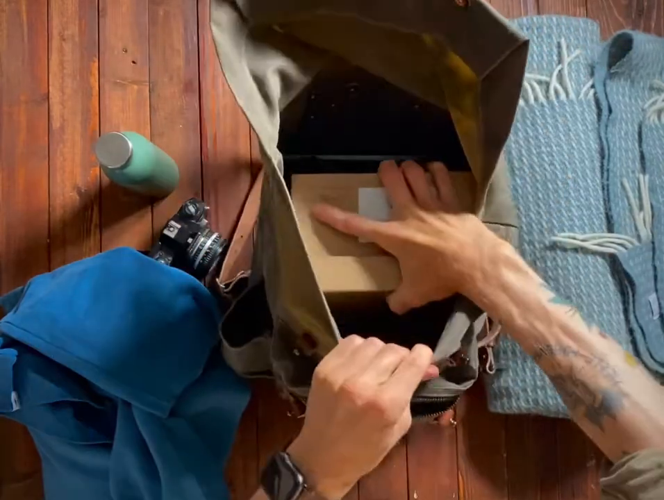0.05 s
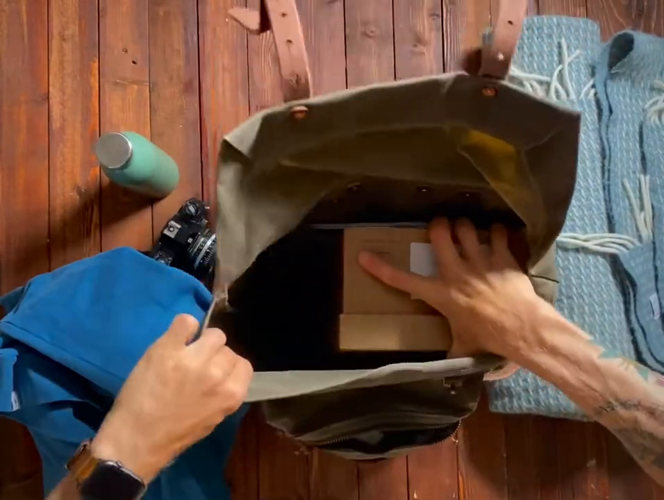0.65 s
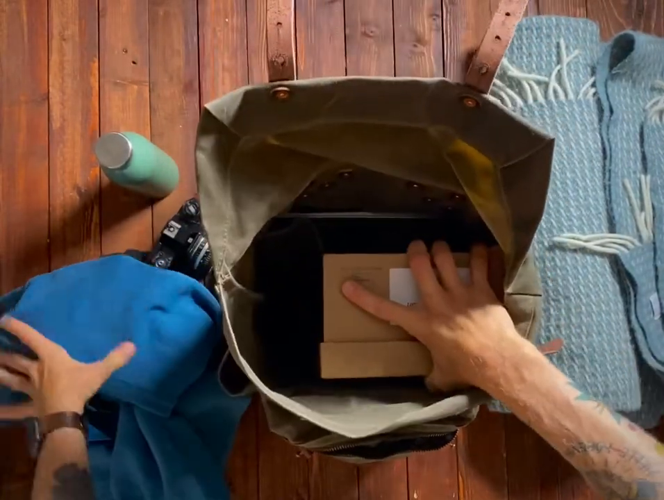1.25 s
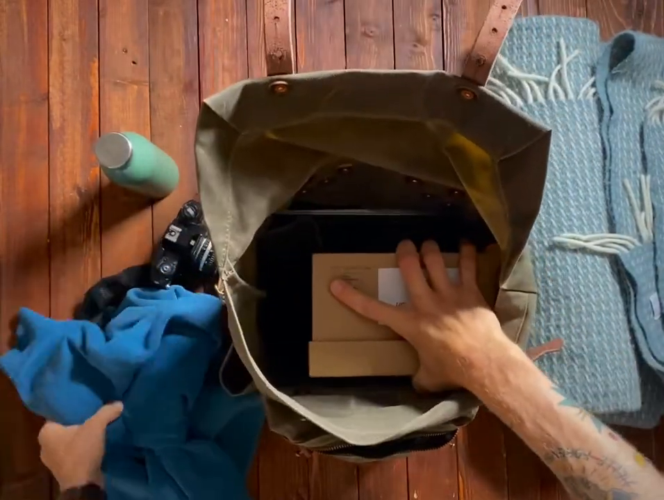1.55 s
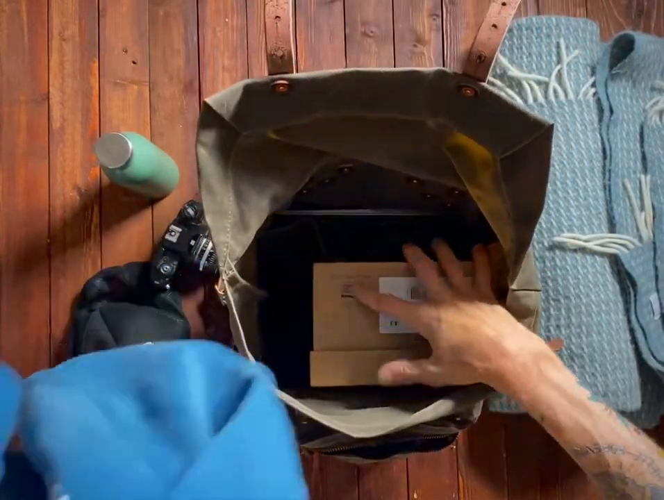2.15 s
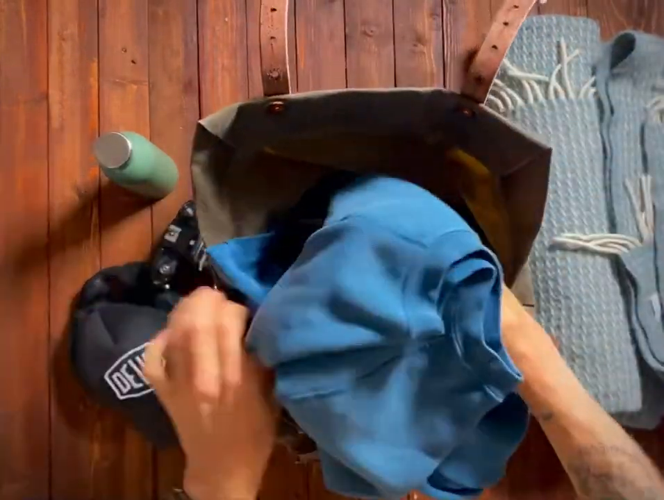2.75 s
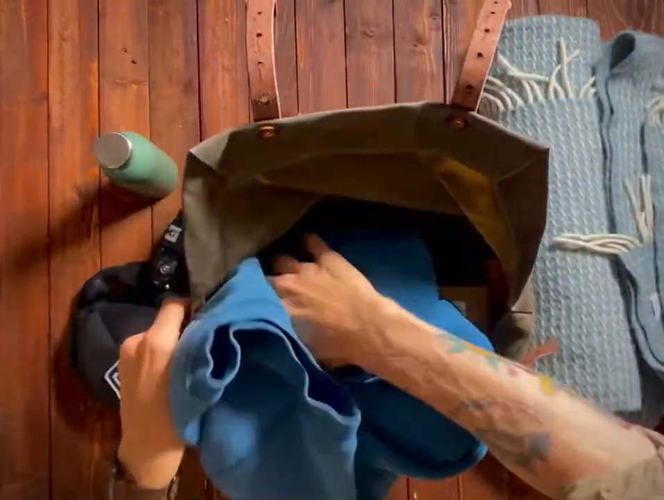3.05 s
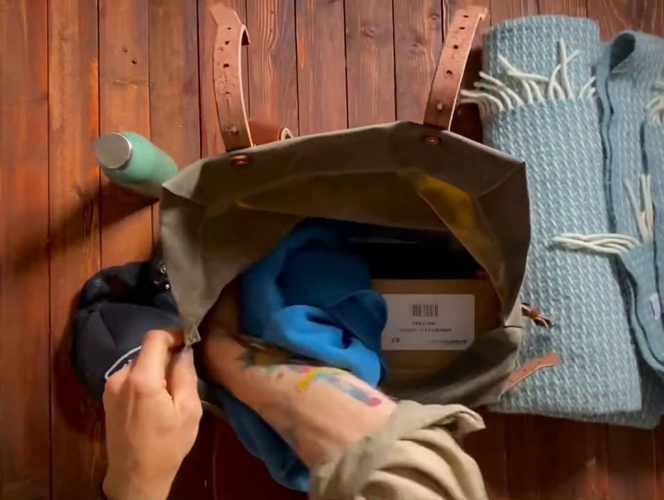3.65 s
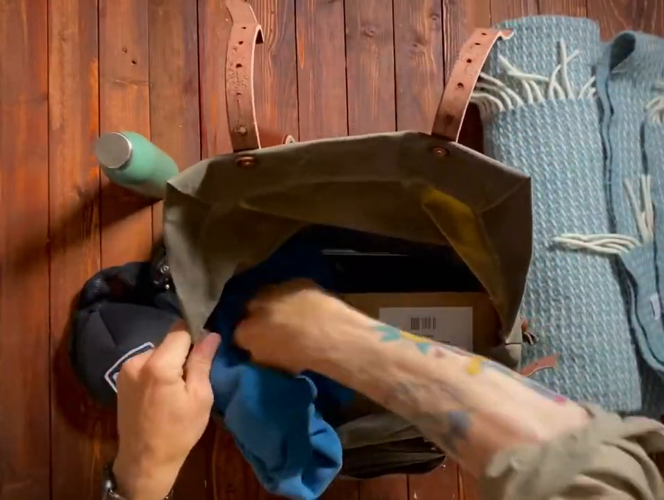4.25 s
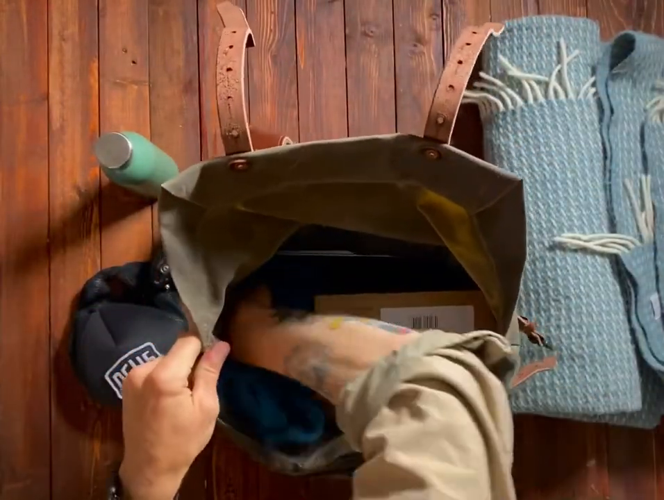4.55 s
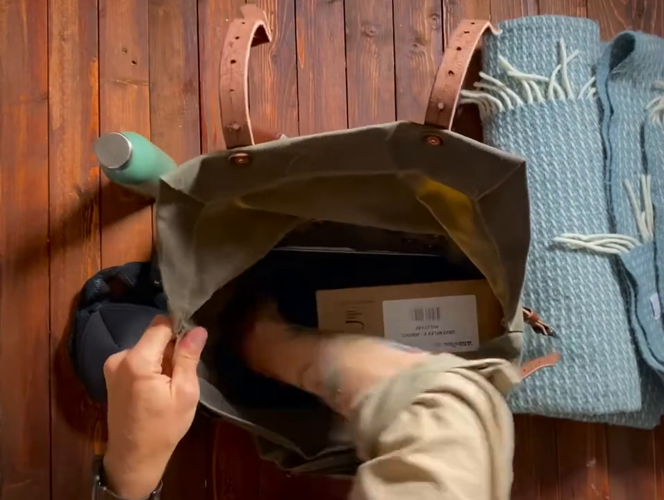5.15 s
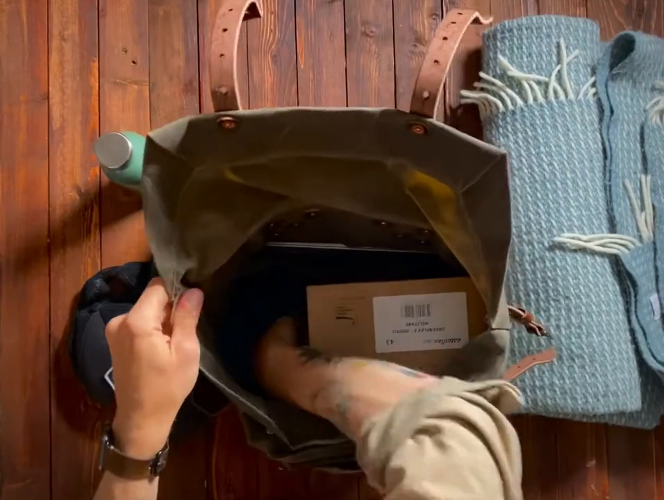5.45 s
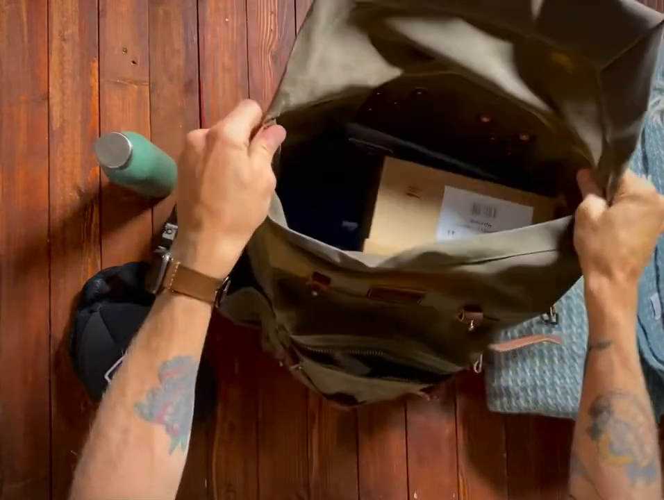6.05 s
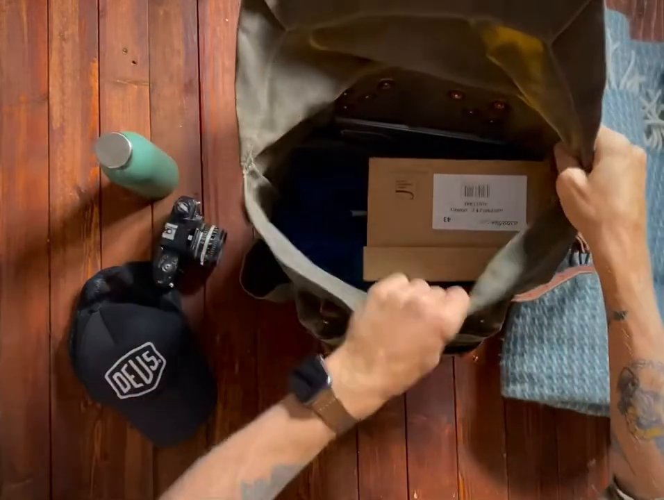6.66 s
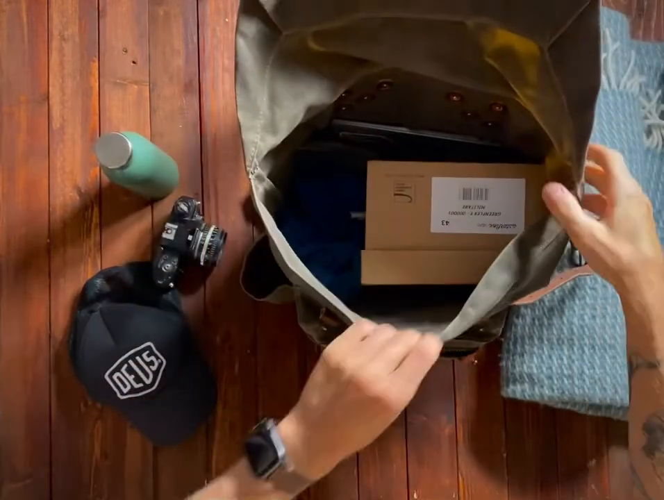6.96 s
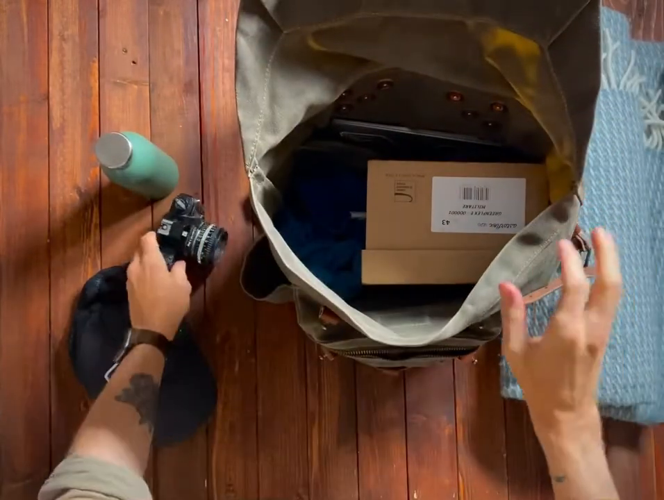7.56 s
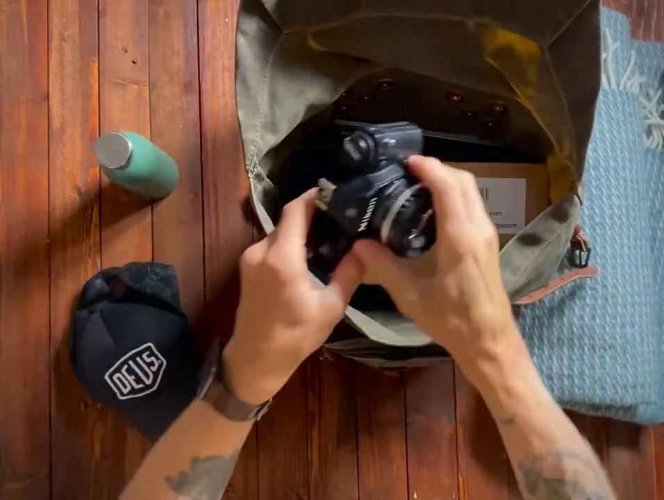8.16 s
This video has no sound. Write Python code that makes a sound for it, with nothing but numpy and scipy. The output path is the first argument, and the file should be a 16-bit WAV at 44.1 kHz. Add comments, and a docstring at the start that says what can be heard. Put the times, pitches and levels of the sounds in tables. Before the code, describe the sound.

For the first second, a stiff canvas backpack is pulled open close by, rasping, snapping taut and flopping on a wooden floor with soft, low thumps. Quieter cloth rustling follows as a sweatshirt is gathered. At about 2.5 seconds a cardboard box drops over with one hollow knock, the loudest sound. From 3 to 5.5 seconds the sweatshirt is stuffed inside in uneven, hissing and scraping pushes, with buckling folds, a few small ticks and a dull bump near 5.2. Around 6 seconds the bag is shaken: canvas snaps, buckles clack sharply and metal fittings tinkle briefly. The rustle and soft bumps die down by 7 seconds. A faint tinkle comes near 7.7, then a camera is picked up with a few dry ticks around 8 seconds. The room is small and boxy, with still air and a very faint appliance whine underneath.

```python
"""A sweatshirt is stuffed into a canvas backpack: threads catch and slip in a hiss and rasp, folds
buckle, and the stiff bag snaps taut and flops on the wooden floor of a small, boxy room.
A cardboard box beside it drops over with one hollow knock. The bag is shaken so that its buckles
clack and its fittings tinkle; then a camera is picked up with a few dry ticks.
Under it all lies a bed of still air with a faint appliance whine."""
import sys
import numpy as np
from scipy import signal
from scipy.fft import rfft, irfft
from scipy.io import wavfile
from scipy.ndimage import uniform_filter1d

SR = 44100
rng = np.random.default_rng(int(sys.argv[2]) if len(sys.argv) > 2 else 0)


def persist_wave(psi):
    """Save psi, clipped to +-1, as 16-bit WAV."""
    counts = np.round(np.clip(psi, -1, 1) * 32767).astype(np.int16)
    wavfile.write(sys.argv[1], SR, np.atleast_2d(counts).T)


N = 366912
TIME, FREQ = np.arange(N) / SR, np.fft.rfftfreq(N, 1 / SR)
HIT_TIME = TIME[:SR // 2]  # half-second clock for one-shots

# Table levels are relative: each layer has its own fader in the mix.
AIR_EQ = [(25, -7), (60, 2), (120, 1), (180, -7.5), (260, -2), (500, -14), (1000, -16.5), (1500, -17.5),
          (2200, -21.5), (2700, -14.5), (3400, -32.5), (8000, -25.5), (15000, -31.5)]  # room tone: f/Hz, level/dB
WHINE = [(1437, -87), (1561, -95)]  # appliance partials: f/Hz, level/dB
ROOM_DECAY = [(100, 0.13), (400, 0.25), (1500, 0.24), (5000, 0.06), (14000, 0.1)]  # reverb time: f/Hz, t60/s
WALL_ECHOES = [(.00752, -13.5), (.00907, -16.5), (0.0183, -14.5)]  # early reflections: delay/s, level/dB
WALL_EQ = [(200, -10), (2000, -1.5), (5000, -6.5), (14000, -12.5)]  # their colour: f/Hz, level/dB
COHERENCE = [(100, 0.98), (300, 0.94), (680, 0.74), (950, 0.13), (1300, 0.69), (1800, 0.77), (2300, 0.35),
             (3600, 0.17), (6500, 0.72), (8000, 0.72), (9000, 1.0), (10500, 0.59), (12300, 1.0),
             (14000, 0.54)]  # how alike left and right are: f/Hz, coherence/0-1
LEFT_LEAD = [(250, 0.03), (750, -0.85), (1100, 0.18), (1800, -0.18), (3000, -1.86), (4000, -0.25),
             (5200, -0.89), (6500, 0.04), (8600, 3.12), (9500, 3.15), (11700, 6.23), (12900, 6.29),
             (14700, 9.4)]  # left ahead of right: f/Hz, phase/rad
BALANCE = [(60, 0.9), (250, 1.85), (500, 2.5), (900, -2.5), (1350, 3), (2300, 0), (3600, -1.5),
           (5000, -4.5), (6500, -.5), (14000, 0)]  # left over right: f/Hz, level/dB

TICKS = [(1.312, -47, -5), (3.6248, -52, -11), (3.76, -52, -9), (4.98, -72, -43), (5.2282, -37, -13),
         (5.7307, -31.5, -14), (6.563, -48, -12), (7.459, -50, -12), (7.9794, -37, -20.5), (8.121, -52, -6),
         (8.1617, -52, -4), (8.181, -39.5, -7), (8.196, -57, -1)]  # fingernails, rivets and camera body: t/s, level/dB, brightness/dB
TICK_EQ = [(300, -14), (1000, -8.5), (1500, -4.5), (2200, -6.5), (2900, -3.5), (4000, -7), (6500, -3.5),
           (13000, -10), (15000, -2.5)]  # dry tick: f/Hz, level/dB
SMALL_PART_MODES = [(2654, 200, 6), (4900, 160, 3)]  # rivets and camera parts: f/Hz, width/Hz, boost/dB
TINKLES = [(5.9808, -41, 0.28), (6.01, -36.5, .6), (6.1444, -42, 0.17), (6.2841, -49.5, .2),
           (6.5021, -60, 0.35), (7.7064, -61.5, 0.025), (7.722, -57.5, .02)]  # fittings touch, damped by cloth or fingers: t/s, level/dB, t60/s
METAL_MODES = [(5090, -12, 0.11), (5300, -14, .1), (6540, -8, .15), (7850, 5, .15), (12290, 2, 0.17),
               (12470, 2, .17), (11800, -7, 0.073), (13100, -6, .08)]  # ring of a fitting: f/Hz, level/dB, t60/s
CLACKS = [(5.875, -32.5, 0.011, -9.5), (5.917, -35, 0.02, -17), (5.9812, -20.5, 0.022, -24.5),
          (6.0099, -20, 0.013, -24)]  # swinging buckles collide: t/s, level/dB, t60/s, brightness/dB
CLACK_EQ = [(300, 0.5), (800, -14), (1150, -2), (1900, -7.5), (2500, -5.5), (4100, -9), (7000, -3.5),
            (12000, -13), (15000, -27)]  # hard clack: f/Hz, level/dB
BUCKLE_MODES = [(1200, 180, 7), (1980, 110, 9), (3510, 70, 13), (4200, 120, 6), (5080, 120, 15),
                (6890, 160, 7), (7680, 110, 6), (11400, 220, 6)]  # buckle resonances: f/Hz, width/Hz, boost/dB

KNOCKS = [(2.555, -4.5)]  # the box falls over: t/s, level/dB
BLOW_EQ = [(40, -30), (90, -4.5), (150, 6), (250, 2), (380, 4), (520, -2.5), (800, -10), (1000, -15),
           (1300, -4), (1600, -17.5), (1950, -20.5), (2250, -47.5), (6000, -42), (14000, -49)]  # its dull impact: f/Hz, level/dB
BOX_MODES = [(170, -1, .3), (216, -6, .25), (370, -8, .14), (416, -6, .15), (480, -7, .2), (557, -7, .18),
             (677, -6, .13), (805, -16, .13), (946, -20, .13), (1175, -19, .15), (1220, -17, .13),
             (1337, -16, .08), (1485, -22, .12)]  # its hollow ring: f/Hz, level/dB, t60/s
CHATTER_EQ = [(100, -30.5), (200, 3), (310, -6.5), (450, -2.5), (600, 0.5), (800, -8), (1300, -22),
              (1900, -29), (2400, -30), (6000, -43)]  # loose cardboard: f/Hz, level/dB

BAG_MODES = [(181, 30, 0.5), (313, 17, 7.5), (360, 25, 1.5), (411, 9.3, 1.5), (559, 67, 5.5), (686, 30, 5),
             (1198, 41, -1), (1945, 410, 7)]  # bag and floor resonances: f/Hz, width/Hz, boost/dB
FLOPS = [(0.011, -22.5, 184), (0.161, -34, 193), (0.412, -33, 146), (0.53, -28, 188), (0.787, -24, 335.4),
         (0.802, -27.5, 133), (2.5, -28, 104), (2.865, -37, 157), (2.917, -34.5, 119), (3.044, -39, 167),
         (3.932, -32.5, 197.7), (5.231, -28, 319), (5.267, -26, 136), (5.834, -23.5, 200),
         (6.449, -39, 142), (6.58, -41, 88), (6.654, -33, 67.3), (7.535, -39.5, 288)]  # the loaded bag lands: t/s, level/dB, f/Hz
SNAPS = [(0.304, -40, 0.075, 4), (0.4524, -26.5, 0.027, -31), (0.6664, -50, 0.037, -36),
         (0.7701, -27.5, 0.06, -42), (0.8026, -30.5, 0.029, -10), (0.828, -44, 0.036, -6),
         (1.2854, -52, 0.06, -35), (2.4633, -50, 0.075, -29), (2.509, -48, 0.032, -37.5),
         (2.8656, -47.5, 0.088, -14), (3.9322, -37, 0.027, -25), (3.9454, -35, 0.028, -19.5),
         (5.2674, -28, 0.24, -49), (5.518, -44.5, 0.3, 26), (5.595, -36.5, 0.029, -4),
         (5.7204, -41.5, 0.036, -19), (5.813, -32.5, 0.075, -21), (6.6513, -42, 0.029, -35),
         (6.8194, -47, 0.065, -17)]  # canvas snaps taut: t/s, level/dB, t60/s, brightness/dB
# taut canvas: f/Hz, level/dB
SNAP_EQ = [(200, -5), (600, -4), (1300, 1), (2000, -9.5), (2600, -7), (13000, -8), (16000, -12.5)]
SKIMS = [(2.043, -49.5, 0.041, 1860), (6.63, -54, 0.034, 1977), (6.88, -63, 0.34, 1820)]  # fingers skim the ribbed weave: centre t/s, level/dB, length/s, rib rate f/Hz
# Hand and sweatshirt stroke the canvas: open the bag, gather, push down, shake, brush past.
# Pressure adds rasp, bulk adds folds: peak t/s, swell/s, fade/s, level/dB, pressure/dB, bulk/dB
STROKES = [ (0.0, .02, 0.12, -43.5, 4, 9), (0.16, 0.35, 0.27, -60.5, 9.5, 12),
           (0.316, 0.056, 0.2, -47, -3.5, -16.5), (0.4, 0.15, 0.11, -53.5, 9.5, 16.5),
           (0.54, 0.41, .13, -52, 5.5, 2.5), (0.67, .1, 0.11, -58.5, 3.5, 10.5),
           (0.802, 0.057, 0.12, -50, 7, 15), (0.92, .15, 0.1, -59, -2.5, -18),
           (1.14, 0.33, 0.64, -64.5, 2, 7.5), (1.325, 0.063, 0.31, -62.5, 10.5, 20),
           (1.46, 0.3, 0.11, -61.5, 2.5, 17), (1.77, 0.22, 0.18, -63, 3.5, 9),
           (2.039, 0.077, 0.1, -57.5, 3.5, 4.5), (2.2, 0.22, 0.096, -65, -3.5, 4),
           (2.509, 0.085, 0.083, -69, 6, 23), (2.63, 0.24, 0.15, -64, 6, 17.5),
           (2.79, 0.087, .15, -67.5, 3.5, 11), (2.93, 0.16, .2, -62, 4, 7),
           (3.056, 0.1, 0.099, -61.5, 11.5, 15), (3.27, 0.41, 0.36, -61, 4.5, 9.5),
           (3.497, 0.27, 0.081, -48, 9, 9.5), (3.816, 0.24, 0.069, -55.5, 1.5, 5.5),
           (3.943, 0.0098, 0.11, -54.5, -2, 14), (4.05, .06, 0.083, -77.5, 15, 7.5),
           (4.3, .24, 1, -56, 5, 8), (4.6, 0.43, 0.25, -47, 5, 9), (4.822, 0.24, 0.037, -56, 8.5, 9.5),
           (5.118, 0.17, .2, -57, 0.5, 5), (5.313, 0.063, 0.1, -47, 7, 11.5),
           (5.54, 0.092, 0.089, -52, -2.5, 3.5), (5.733, .015, 0.058, -53.5, -0.5, 11),
           (5.836, 0.038, 0.046, -54, 6, 16), (5.88, .04, 0.06, -50, -5, 9),
           (5.97, 0.25, 0.21, -59, 4.5, 17.5), (6.05, 0.12, .05, -52.5, -14, 10.5),
           (6.157, 0.21, .15, -57.5, 12, 26), (6.34, 0.2, 0.17, -62.5, 1, 6),
           (6.64, .14, 0.16, -65, 7, 13.5), (6.925, 0.17, 0.072, -54, -2.5, -6),
           (7.25, .08, 0.85, -78.5, 0, -4.5), (7.56, .12, 0.082, -72, 8.5, 18.5),
           (7.98, 0.015, 0.28, -63.5, -4.5, 1), (8.19, 0.27, 0.23, -69, 0, -7)]
HEAVES = [(0.015, 0.1, 0.15, -34), (0.41, 0.18, 0.08, -33.5), (0.54, 0.19, 0.11, -37.5),
          (0.82, 0.071, 0.076, -28.5), (1.4, 1, 0.46, -62), (1.9, .35, 0.18, -56), (2.52, 0.12, .1, -47.5),
          (2.61, .06, 0.16, -39), (2.878, 0.031, 0.11, -44.5), (3.05, 0.047, 0.14, -48),
          (3.3, 0.42, 0.57, -52.5), (3.535, 0.16, 0.062, -40), (3.8, 0.18, 0.075, -47),
          (3.95, 0.018, 0.082, -45), (4.07, 0.038, 0.062, -54), (4.65, 0.56, 0.32, -45),
          (5.135, 0.11, .08, -45.5), (5.25, 0.031, 0.1, -36), (5.61, .05, 0.057, -39),
          (5.855, 0.055, 0.05, -29), (6.19, 0.24, 0.22, -39.5), (6.635, 0.19, 0.34, -52.5),
          (7.57, 0.1, .08, -50.5)]  # the whole bag shifts on the floor: peak t/s, swell/s, fade/s, level/dB
AIR_POCKET = [(0.4, 560), (1.4, 416), (2.9, 560), (3.5, 785), (4.35, 420), (4.7, 595), (5.3, 570),
              (6.15, 790), (7.5, 333)]  # resonance of the changing gap between hand and canvas: t/s, f/Hz
SLIDE_EQ = [(1200, -25), (2000, -5), (2300, -8), (2800, -3), (3700, -5), (5000, -3), (5900, -5),
            (7000, -3.5), (12000, -6.5), (15000, -10)]  # lightly sliding cloth: f/Hz, level/dB
SCRAPE_EQ = [(300, -25), (650, 1), (900, -4.5), (1250, 1), (1600, 0), (2000, -7.5), (2300, -7.5),
             (4000, -16.5), (9000, -42)]  # pressed canvas: f/Hz, level/dB
FOLD_EQ = [(100, -37), (200, 1), (310, 3.5), (450, 2), (600, -4), (800, -15), (1300, -20.5), (3000, -58.5)]  # buckling folds: f/Hz, level/dB
HEAVE_EQ = [(20, -37), (45, -11), (80, 0.5), (110, -3.5), (160, 3), (200, -6), (280, -14.5), (700, -69.5)]  # low end of the shifting bag: f/Hz, level/dB


def amp(db):
    """Decibels to gain."""
    return 10 ** (np.asarray(db) / 20)


def unit(x):
    """Normalises to rms 1."""
    return x / np.sqrt(np.mean(x ** 2) + 1e-20)


def curve_at(points, hz):
    """Reads a curve on a log-frequency axis."""
    f, value = np.transpose(points)
    return np.interp(np.log(hz + 1), np.log(f + 1), value)


def place(mix, s, sound):
    """Lays a sound into the mix at s seconds."""
    part = mix[max(round(s * SR), 0):][:len(sound)]
    part += sound[:len(part)]


def eq(x, spectrum, modes=(), size=4096):
    """Minimum-phase EQ: a smooth curve plus resonant bells."""
    hz = abs(np.fft.fftfreq(size, 1 / SR))
    bells_db = sum(boost / (1 + (2 * (hz - f) / width) ** 2) for f, width, boost in modes)
    log_gain = np.log(amp(curve_at(spectrum, hz) + bells_db))
    taps = np.fft.ifft(np.exp(np.conj(signal.hilbert(log_gain)))).real
    return signal.oaconvolve(x, taps)[:len(x)]


def swept_band(x, hz, width_hz):
    """A resonance that follows the curve hz, doubled for steep sides."""
    carrier = np.exp(2j * np.pi * np.cumsum(hz) / SR)
    pole = np.exp(-np.pi * width_hz / SR)
    return (carrier * signal.lfilter([(1 - pole) ** 2], [1, -2 * pole, pole ** 2], x / carrier)).real


def wander(rate_hz):
    """Smooth random modulation of rms 1, rolling off above rate_hz."""
    return unit(irfft(rfft(rng.standard_normal(N)) / (1 + (FREQ / rate_hz) ** 4), N))


def ring(modes):
    """A struck object rings freely in decaying sines."""
    return sum(amp(db - 60 * HIT_TIME / t60) * np.sin(2 * np.pi * hz * HIT_TIME) for hz, db, t60 in modes)


def attack(rise_s):
    """Rounds the onset of a one-shot."""
    return 1 - np.exp(-HIT_TIME / rise_s)


def burst(t60, rise_s):
    """A dying puff of noise."""
    return rng.standard_normal(len(HIT_TIME)) * amp(-60 * HIT_TIME / t60) * attack(rise_s)


def room_tone():
    """The bed: still air and a faint, wavering appliance whine."""
    air = amp(-71.5) * unit(eq(rng.standard_normal(N), AIR_EQ))
    for hz, db in WHINE:
        phase = 2 * np.pi * np.cumsum(hz + 5 * wander(35)) / SR
        air += amp(db) * unit(np.sin(phase))
    return air


def reverb(x):
    """Sparse reflections from floor and walls, the treble dying first."""
    size = len(HIT_TIME)
    taps = rng.choice([-1., 1.], size) * (rng.random(size) < 3000 / SR) * (HIT_TIME > .005)
    hz, t, bands = signal.stft(taps, SR, nperseg=256)
    decay = amp(-60 * t / curve_at(ROOM_DECAY, hz)[:, None])
    tail = signal.istft(bands * decay, SR, nperseg=256)[1]
    return signal.oaconvolve(x, tail / np.linalg.norm(tail))[:N]


def with_walls(x):
    """The nearest walls answer within milliseconds, turning the sound boxy."""
    out, dulled = x.copy(), eq(x, WALL_EQ)
    for delay, db in WALL_ECHOES:
        place(out, delay, amp(db) * dulled)
    return out


def stereo_pair(direct, diffuse):
    """Mid/side image of two close mics: alike in the bass, drifting apart in the treble."""
    coherence = np.where(FREQ < 200, .99, curve_at(COHERENCE, FREQ))
    mid, side = rfft(direct), rfft(diffuse) * np.sqrt((1 - coherence) / (1 + coherence))
    lead = curve_at(LEFT_LEAD, FREQ) * np.minimum(FREQ / 250, 1)
    pan = amp(curve_at(BALANCE, FREQ) / 2) * np.exp(.5j * lead)
    return irfft(np.array([(mid + side) * pan, (mid - side) / pan]), N)


def strikes(cues, spectrum, modes, rise_s, tail_db, tail_t60):
    """Short cracks, each with its own treble shelf and a weak rustle after it."""
    out = np.zeros(N)
    for s, db, t60, brightness in cues:
        shelf_db = brightness + 9.5  # ramps in from 1.5 to 7.5 kHz
        tilted = [(hz, level + shelf_db * np.clip(np.log(hz / 1500) / np.log(5), 0, 1))
                  for hz, level in spectrum]
        crack = eq(burst(t60, rise_s) + amp(tail_db) * burst(tail_t60, .0037), tilted, modes)
        peak_rms = np.sqrt(uniform_filter1d(crack ** 2, size=128).max())
        place(out, s, amp(db) * crack / peak_rms)
    return out


def dry_ticks(t60=.017):
    """Fingernails, rivets and the camera's body make tiny, hard contacts."""
    cues = [(s, db, t60, brightness) for s, db, brightness in TICKS]
    return strikes(cues, TICK_EQ, SMALL_PART_MODES, rise_s=.0001, tail_db=-15, tail_t60=.122)


def fitting_tinkles(detune=.0132):
    """Light metal chatters for an instant and rings on, each fitting slightly off pitch."""
    out = np.zeros(N)
    for s, db, t60 in TINKLES:
        modes = [(hz * (1 + detune * rng.standard_normal()), level, decay)
                 for hz, level, decay in METAL_MODES]
        jingle = signal.oaconvolve(burst(.07, .00035), ring(modes))[:len(HIT_TIME)]
        jingle *= amp(-60 * HIT_TIME / t60)
        place(out, s, amp(db) * jingle / abs(jingle).max())
    return out


def buckle_clacks():
    """Swinging buckles hit with a sharp attack and a bright, resonant body."""
    return strikes(CLACKS, CLACK_EQ, BUCKLE_MODES, rise_s=.00019, tail_db=-15, tail_t60=.12)


def box_knock():
    """A dull blow, the ring of the cardboard, and its edge chattering to rest."""
    blow = eq(1. * (HIT_TIME == 0), BLOW_EQ)
    hz = np.fft.rfftfreq(len(blow), 1 / SR)
    lag = 18 * np.sqrt(np.minimum(hz, 2500) / 1000)  # in a bending board the bass travels slowest
    blow = irfft(rfft(blow) * np.exp(-1j * lag), len(blow)) * (HIT_TIME < .1)
    body = ring(BOX_MODES) * attack(.0026)
    chatter = unit(eq(burst(.14, .0024), CHATTER_EQ, BAG_MODES))
    knock = amp(-4.5) * blow / abs(blow).max() + amp(-25) * body + amp(-34.5) * chatter
    out = np.zeros(N)
    for s, db in KNOCKS:
        place(out, s, amp(db) * knock)
    return out


def bag_flops(t60=.12):
    """Padded weight lands: a low, soft-edged thump and a puff of cloth."""
    out = np.zeros(N)
    for s, db, hz in FLOPS:
        thump = ring([(hz, 0, t60)]) * attack(.0053)
        puff = eq(burst(t60, .001), FOLD_EQ, BAG_MODES)
        place(out, s, amp(db) * (thump + amp(-10) * puff / abs(puff).max()))
    return out


def canvas_snaps():
    """Slack canvas jerks taut and sounds the hollow of the bag."""
    return strikes(SNAPS, SNAP_EQ, BAG_MODES, rise_s=.0011, tail_db=-24.5, tail_t60=.14)


def finger_skims():
    """Ribs of the weave pass under a finger at an unsteady rate: a short, breathy note."""
    out, speed = np.zeros(N), 1 + .0827 * wander(410)
    for s, db, length, hz in SKIMS:
        envelope = np.cos(np.pi * np.clip((TIME - s) / length, -.5, .5)) ** 2
        out += amp(db) * envelope * np.sin(2 * np.pi * np.cumsum(hz * speed) / SR)
    return out


def slips(per_s, spread_db):
    """Stick-slip: tiny releases at random moments, a few much larger than the rest."""
    chance = rng.random(N)
    at = np.flatnonzero(chance < per_s / SR)
    size = np.minimum(np.log(per_s / SR / chance[at]), 4)
    out = np.zeros(N)
    out[at] = amp(spread_db * size) * rng.choice([-1., 1.], N)[at]
    return out


def gestures(cues, range_db=20, roundness=1.15, settling_db=-86.5):
    """Envelope of overlapping moves: each climbs range_db over its swell and drops it over its fade."""
    t = np.linspace(0, N / SR, N // 64)
    power = amp(settling_db) ** 2
    for s, swell, fade, db in cues:
        from_peak = np.maximum((s - t) / swell, (t - s) / fade)
        power += amp(db - range_db * from_peak ** roundness) ** 2
    return np.interp(TIME, t, np.sqrt(power))


def crumple(paths, depth_db):
    """Pockets in the cloth open and close, so its colour keeps shifting."""
    bands = signal.stft(paths, nperseg=1024, noverlap=768)[2]
    patches = rng.standard_normal((bands.shape[2], bands.shape[1])).T
    for size, axis in (3, 0), (10, 1), (6, 1):  # blur once in frequency, twice in time
        patches = uniform_filter1d(patches, size, axis)
    return signal.istft(bands * amp(depth_db * unit(patches)), nperseg=1024, noverlap=768)[1][:, :N]


def cloth_rustle():
    """Threads catch and let go; pressed folds buckle and shake the bag. Gives near and scattered paths."""
    s, swell, fade, db, pressure, bulk = np.transpose(STROKES)
    grip = amp(.6 * wander(30))  # the hand drags unevenly
    slide, scrape, folds = (grip * gestures(zip(s, swell, fade, level))
                            for level in (db, db + pressure, db + bulk))
    heave = np.hypot(grip * gestures(HEAVES), amp(-15.5) * folds)
    pocket_hz = np.interp(TIME, *np.transpose(AIR_POCKET))
    creases = slips(per_s=89, spread_db=1.2)  # stiff creases give way all at once
    crinkle = amp(-11) * unit(eq(creases, SLIDE_EQ)) * slide
    crinkle += amp(-17) * unit(eq(creases, SCRAPE_EQ, BAG_MODES)) * scrape
    paths = []
    for _ in range(2):
        hiss = amp(.86) * unit(eq(slips(9000, 1.4), SLIDE_EQ)) * slide
        rasp = amp(-2.1) * unit(eq(slips(2000, 1.5), SCRAPE_EQ, BAG_MODES)) * scrape
        rumple = amp(-1) * unit(eq(slips(700, 2.1), FOLD_EQ, BAG_MODES)) * folds
        rumble = amp(1.93) * unit(eq(slips(400, 1), HEAVE_EQ, BAG_MODES)) * heave
        pocket = amp(-8) * unit(swept_band(slips(2000, 1.8), pocket_hz, width_hz=210)) * scrape
        paths.append(hiss + rasp + pocket + rumple + rumble)
    paths[0] += crinkle
    return crumple(np.array(paths), depth_db=2.5)


def scene():
    """The mix: cloth up close, hits sent to the reverb, room tone underneath."""
    cracks = amp(-8) * canvas_snaps() + amp(-3.5) * buckle_clacks() + amp(-3) * dry_ticks()
    knock = box_knock()
    hits = cracks + bag_flops() + fitting_tinkles()
    send = hits + amp(-8.5) * knock  # the bag muffles the box before it reaches the room
    near, scattered = amp(-.71) * cloth_rustle()
    direct = with_walls(near + finger_skims() + hits + knock) + amp(-12) * reverb(send) + room_tone()
    diffuse = with_walls(scattered) + amp(-6.5) * reverb(send) + room_tone()
    return stereo_pair(direct, diffuse)


def record(dry):
    """A steep low-pass on the master trims the very top."""
    lowpass = signal.firwin(255, cutoff=14650, window=("kaiser", 8), fs=SR)
    return signal.oaconvolve(dry, lowpass[None], "same")


dry = scene()
out = record(dry)
persist_wave(out)
```